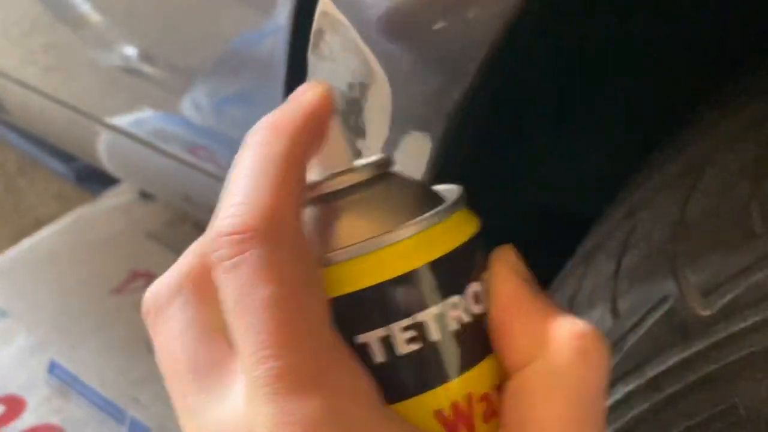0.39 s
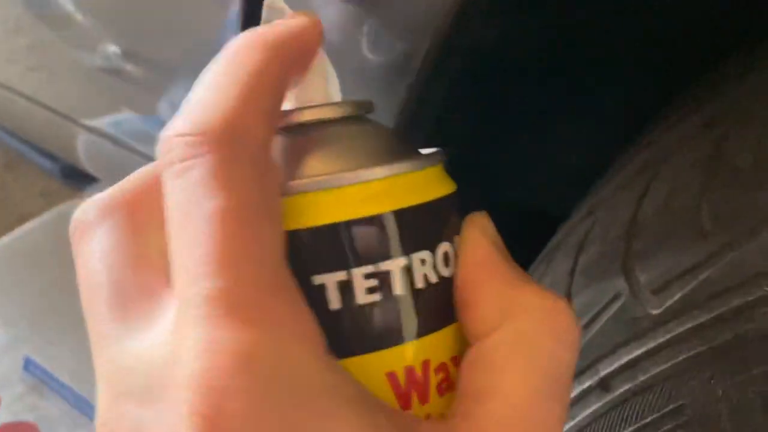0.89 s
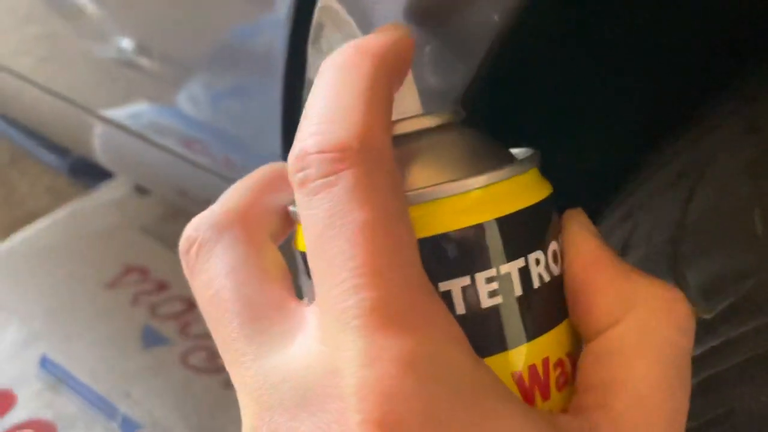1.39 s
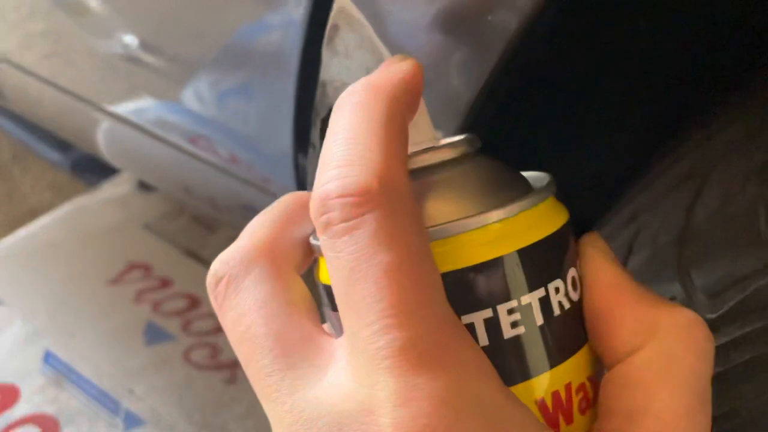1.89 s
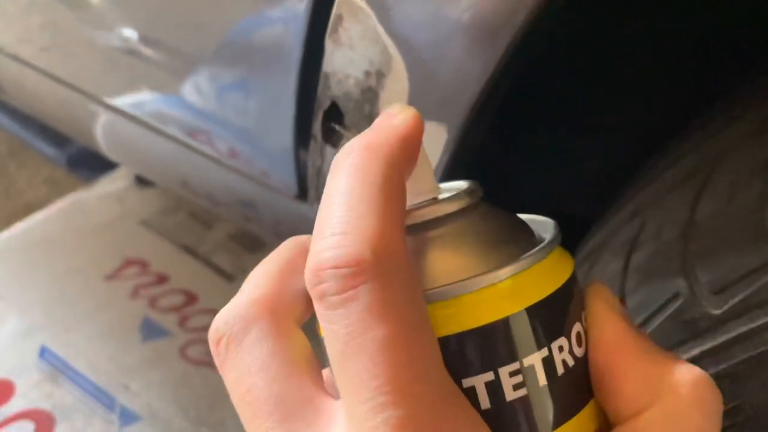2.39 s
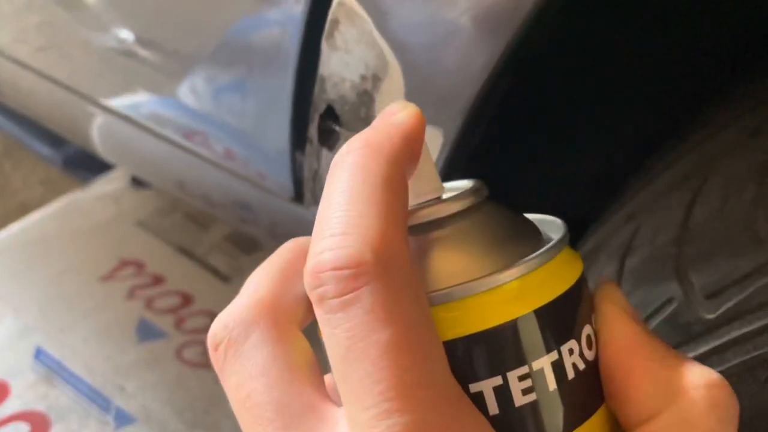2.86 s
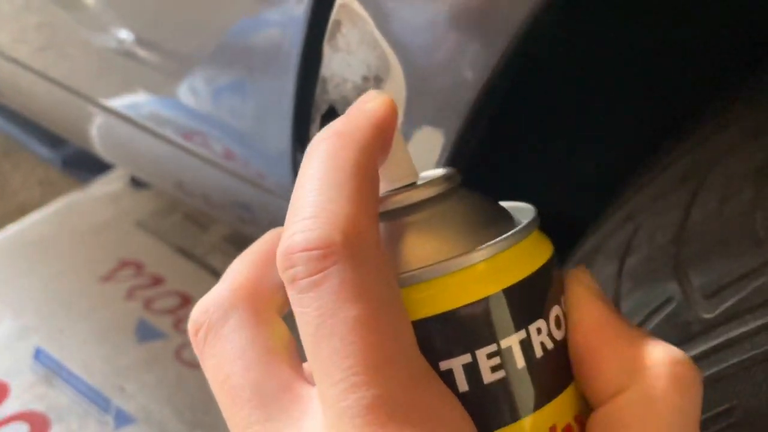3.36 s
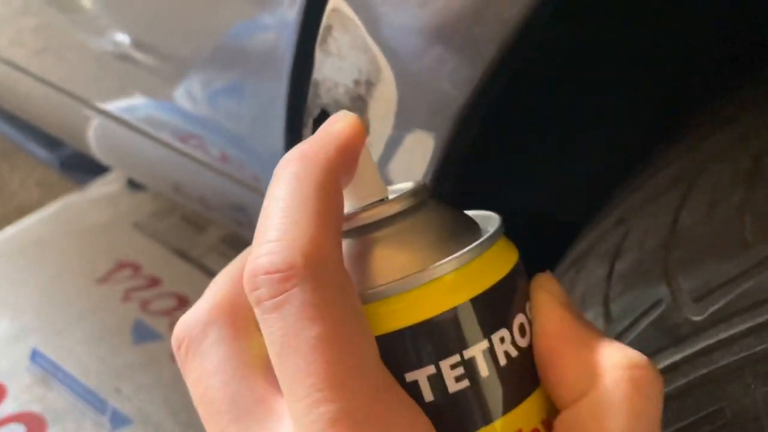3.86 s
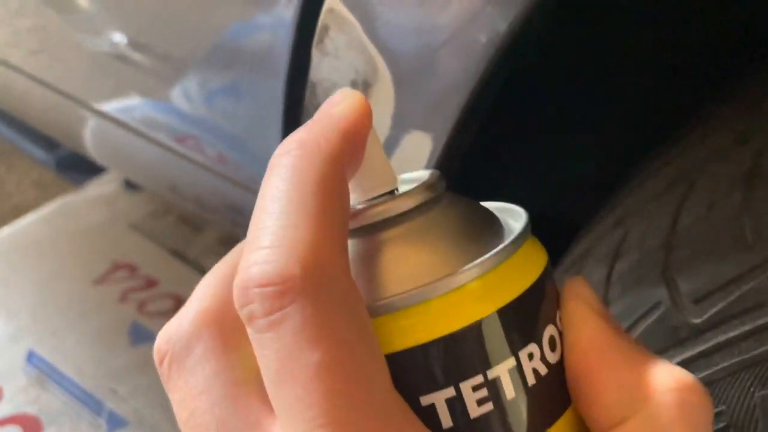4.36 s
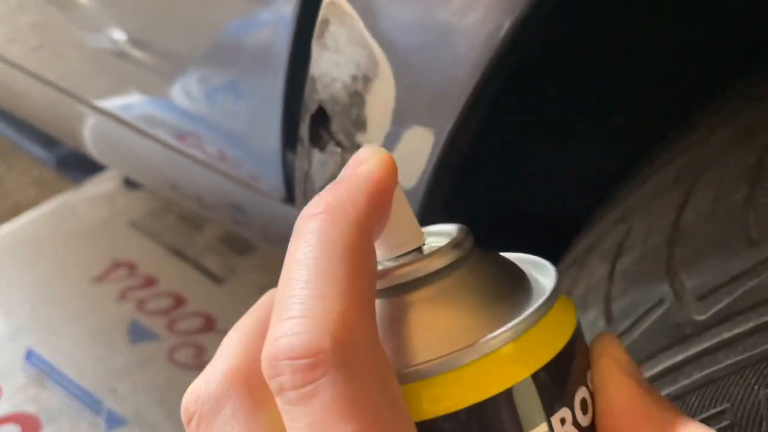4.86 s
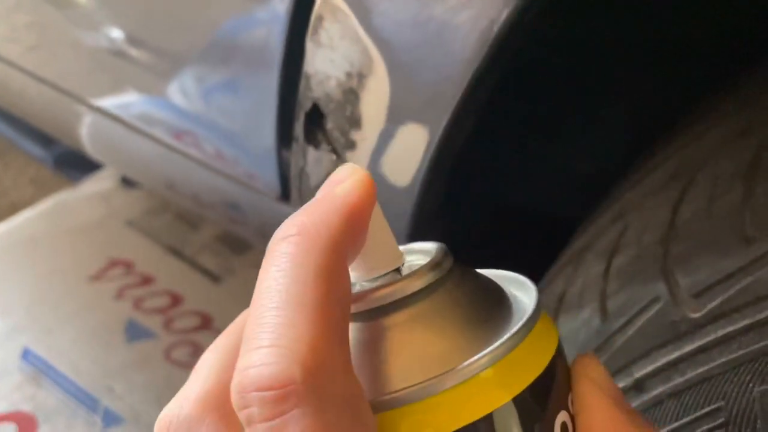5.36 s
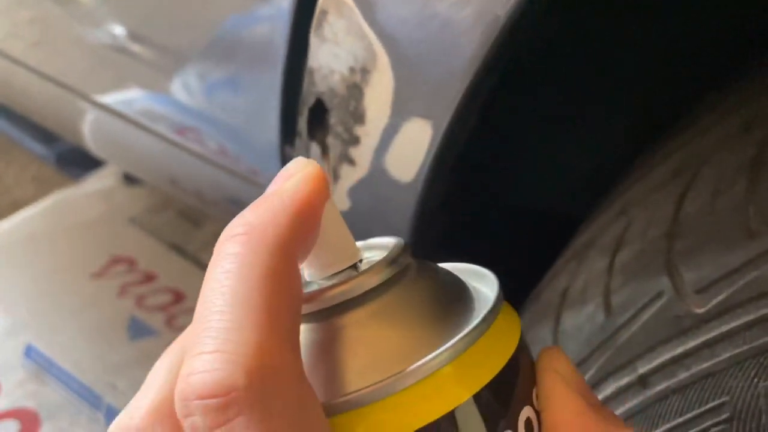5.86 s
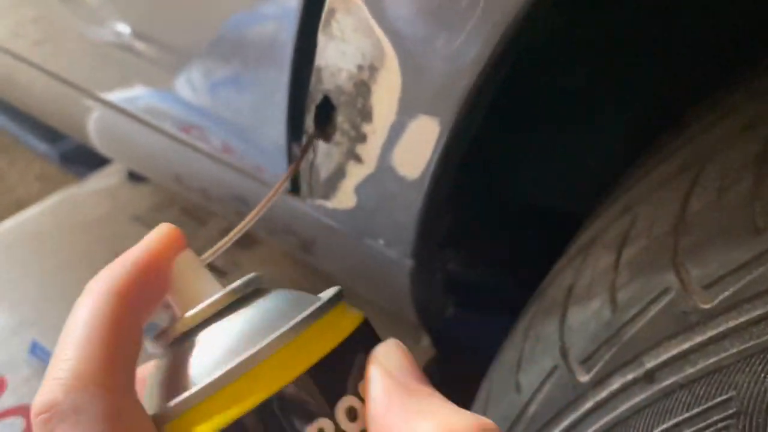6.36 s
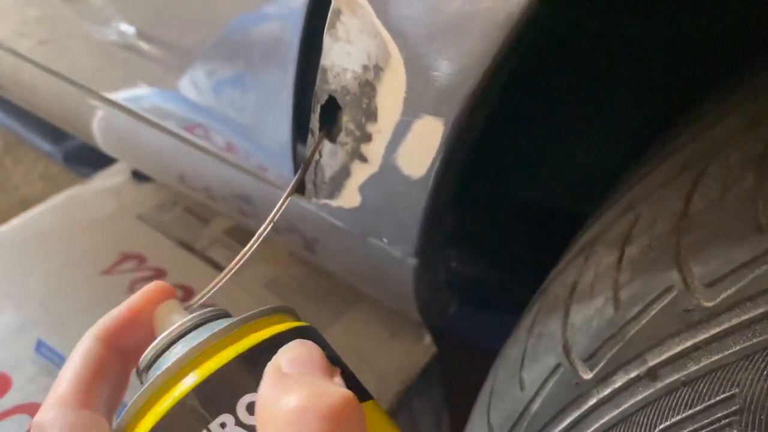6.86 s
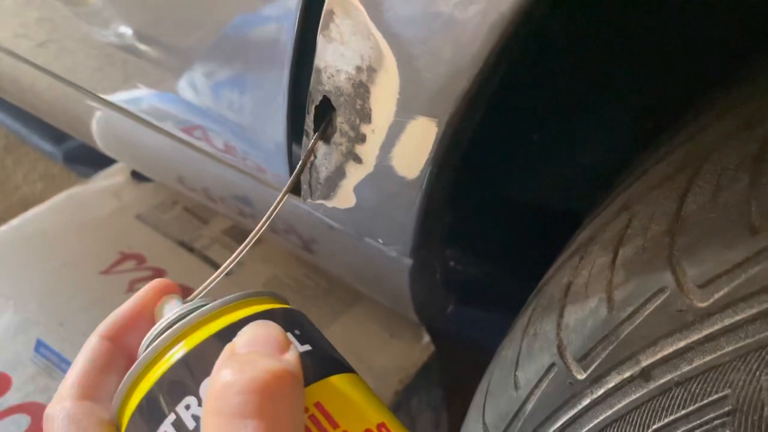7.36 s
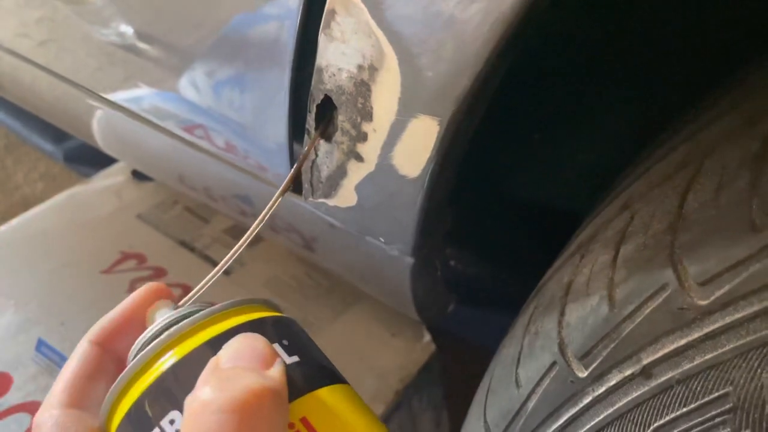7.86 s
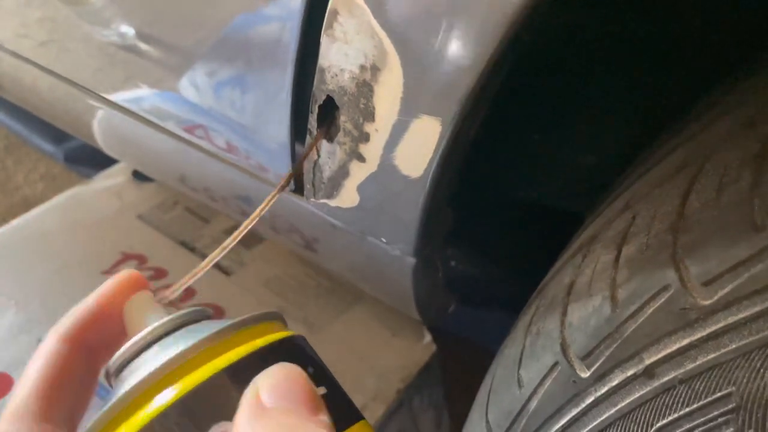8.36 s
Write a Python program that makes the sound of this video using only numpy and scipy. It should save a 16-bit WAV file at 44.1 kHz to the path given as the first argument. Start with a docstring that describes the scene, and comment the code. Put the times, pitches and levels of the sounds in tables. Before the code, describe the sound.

Close aerosol hiss through a thin straw into a hollow steel panel, faint and muffled at first, then bright uneven bursts, with plastic clicks and small knocks.

```python
"""Wax sprayed into a hollow panel

In a workshop, an aerosol can sprays wax through a thin straw into a hollow steel panel, close to a
two-port microphone. A finger opens and shuts the valve: gas hisses at the nozzle, spray rushes in the
straw and booms in the cavity, all as coloured turbulent noise. The plastic button clicks and the straw
knocks the panel, as decaying modes under a short crack; the walls answer and the place rumbles faintly."""
import sys
import numpy as np
from scipy import signal
from scipy.fft import rfft, irfft, next_fast_len
from scipy.io import wavfile
from scipy.ndimage import uniform_filter1d, map_coordinates

SR = 44100
rng = np.random.default_rng(int(sys.argv[2]) if len(sys.argv) > 2 else 0)


def materialize(psi):
    """Save the field psi as 16-bit PCM at rate SR to the path in sys.argv[1].

    A 1-D psi becomes a single channel; in a 2-D psi each row is a channel.
    """
    bounded = np.clip(np.atleast_2d(psi).T, -1, 1)
    quanta = np.round(bounded * 32767).astype(np.int16)
    wavfile.write(sys.argv[1], SR, quanta)


def invert_db(level):
    """Linear amplitude ratio for a level in decibels (20 dB per decade), elementwise."""
    return 10 ** (np.asarray(level, dtype=float) / 20)


N = 385434
T = np.arange(N) / SR  # time of each sample [s]


def unit(x):
    """Scaled to rms 1."""
    return x / np.sqrt(np.mean(x ** 2) + 1e-20)


def along(points, hz):
    """Reads (frequency, value) points at hz, on a log frequency axis."""
    f, v = np.transpose(points)
    return np.interp(np.log(hz + 1), np.log(f + 1), v)


def curves(rows):
    """One value per sample for each column after the time."""
    s, *cols = np.array(sorted(rows)).T
    return [np.interp(T, s, c) for c in cols]


def wobble(rate):
    """A smooth random curve, rate knots a second."""
    knots = rng.standard_normal(int(N * rate / SR) + 4)
    return map_coordinates(knots, [T * rate])


def filtered(x, response):
    """x times a complex response of frequency."""
    m = next_fast_len(N + SR // 2)
    hz = np.fft.rfftfreq(m, 1 / SR)
    return irfft(rfft(x, m) * response(hz), m)[..., :N]


def coloured(x, spectrum, skirt_db):
    """x at rms 1 through a spectrum that falls by skirt_db an octave for four octaves beyond its ends."""
    (lo, lo_db), (hi, hi_db) = spectrum[0], spectrum[-1]
    closed = [(lo / 16, lo_db - 4 * skirt_db), *spectrum, (hi * 16, hi_db - 4 * skirt_db)]
    return unit(filtered(x, lambda hz: invert_db(along(closed, hz))))


def turbulence(patchy_db, spit_db, spit_rate):
    """Two unrelated noises sharing drifting patches and the spit of droplets."""
    z = signal.stft(rng.standard_normal((2, N)), nperseg=512)[2]
    field = rng.standard_normal(z.shape[1:])
    field = uniform_filter1d(field, size=5, axis=0)  # smooth over frequency
    field = uniform_filter1d(field, size=12, axis=1)  # smooth over time
    pair = signal.istft(z * invert_db(patchy_db * unit(field)), nperseg=512)[1][:, :N]
    return pair * invert_db(spit_db * wobble(spit_rate))


def workshop():
    """A low, slightly lumpy rumble with a faint hiss above it."""
    # swell of the background: (time [s], level [dB])
    rumble = [(0, -50), (1, -52), (2.3, -53.5), (3.4, -54), (5.6, -55.5), (6.1, -53.5), (6.7, -54.5),
              (7.6, -52.5), (8.74, -58)]
    # its spectrum: (frequency [Hz], relative level [dB])
    shop = [(25, -14), (45, -5.5), (65, 3), (95, -2), (130, -8), (240, -20), (800, -30.5), (2200, -40),
            (4900, -47), (8000, -52.5), (12000, -43), (14000, -58)]
    lumpy = turbulence(patchy_db=1.2, spit_db=.7, spit_rate=5)
    return invert_db(curves(rumble)[0]) * coloured(lumpy, shop, skirt_db=15)


def echo(x):
    """The walls answer with a diffuse tail, each frequency dying at its own speed."""
    # decay of the room: (frequency [Hz], t60 [s])
    walls = [(200, 0.59), (3000, 0.38), (12000, 0.04)]
    hz, t, z = signal.stft(rng.standard_normal((2, SR // 2)), SR, nperseg=256)
    fading = invert_db(-60 * t / along(walls, hz)[:, None])
    tail = signal.istft(z * fading, SR, nperseg=256)[1]
    return signal.fftconvolve(x, tail / np.linalg.norm(tail[0]), axes=1)[:, :N]


def bounced(x):
    """Near surfaces send weak copies of the direct sound, whose delays drift as the hand moves."""
    # off panel, tyre and floor: (mean delay [s], level [dB])
    bounces = [(.0011, -13), (.0023, -12), (.0047, -12)]
    direct, scattered = x
    late = 0
    for delay, db in bounces:
        drifting = delay * (1 + .09 * wobble(2))
        late = late + invert_db(db) * np.interp(T - drifting, T, direct)
    return np.array([direct + late, scattered])


def struck(events, modes, crack, rise):
    """Each blow rings the modes at new strengths, over a short thin crack; its tilt favours high or low modes."""
    out, t = np.zeros(N + SR), T[:SR // 8]
    for s, db, ring_share, tilt_db in events:
        ring = 0
        for hz, level, t60 in modes:
            tilt = tilt_db * np.log2(hz / modes[1][0])  # pivots on the second mode
            mode_db = level + tilt + rng.normal(0, 1) - 60 * t / t60
            ring = ring + invert_db(mode_db) * np.sin(2 * np.pi * hz * t)
        grit = rng.standard_normal(len(t) + 1)
        thin = grit[1:] - .75 * grit[:-1]
        snap = crack * invert_db(-60 * t / .008) * thin  # t60 8 ms
        onset = 1 - np.exp(-t / rise)
        out[round(s * SR):][:len(t)] += invert_db(db) * (ring_share * ring + snap) * onset
    return out[:N]


def straw_knocks():
    """The straw knocks the panel, whose low steel modes ring briefly after a soft onset."""
    # blows: (time [s], level [dB], tilt [dB an octave])
    knocks = [(0.973, -41, 8.5), (.998, -47, -9), (1.281, -29.5, 2.5), (1.289, -29.5, -9)]
    # modes of the panel: (frequency [Hz], level [dB], t60 [s])
    panel = [(192, -10, 0.046), (324, 1.5, 0.054), (537, -1, 0.026), (776, -1, 0.026), (1330, -23, .03)]
    blows = [(s, db, 1, tilt_db) for s, db, tilt_db in knocks]
    return struck(blows, panel, crack=.01, rise=0.002) * [[1], [.3]]  # direct, scattered


def button_clicks():
    """The plastic button clicks: high, fast-dying modes under a strong crack."""
    # clicks: (time [s], level [dB], strength of the ringing [factor], tilt [dB an octave])
    clicks = [(0.704, -5, 0.65, -3), (1.8597, -40, 0.19, -4), (1.8811, -26, 0.4, -15),
              (2.154, -21.5, 0.4, -18.5), (3.8067, -36, 0.24, 5), (3.941, -34.5, 0.26, 1),
              (4.151, -18, 0.24, -5.5), (8.436, -43.5, 0.18, -1), (8.6727, -28.5, 0.11, -10)]
    # modes of the button: (frequency [Hz], level [dB], t60 [s])
    button = [(1500, -24, .005), (3200, 0, .011), (3530, -12, .02), (4700, -7, .006), (8600, -8, .005),
              (13000, 0, .005)]
    return bounced(struck(clicks, button, crack=0.54, rise=0.00012) * [[1], [.3]])  # direct, scattered


def valve(rise):
    """Pressure builds within rise s of each press, slower through a leak, and dies away after it."""
    # finger on the button: (presses [s], lets go [s], t60 of the pressure dying in the straw [s])
    presses = [(-.1, 1.69, .1), (1.858, 2.515, .04), (2.663, 4.562, .04), (4.629, 5.037, .015),
               (5.166, 8.054, .06), (8.078, 8.336, .065), (8.629, 9, .1)]
    # the valve barely open: (from [s], to [s])
    leaks = [(4.56, 4.63), (5.04, 5.166), (8.585, 8.63)]
    leak_db, leak_t60_s = -19.5, .03
    openings = [(*press, 0) for press in presses] + [(*leak, leak_t60_s, leak_db) for leak in leaks]
    pressure = 0
    for on, off, t60, db in openings:
        build = np.clip((T - on) / (rise / invert_db(db)), 0, 1)
        pressure = pressure + build * invert_db(db - 60 * np.clip(T - off, 0, None) / t60)
    return pressure


def gas_jet(jet_db, sharp):
    """Gas hisses at the nozzle, between a soft and a sharp colour; a weak jet is all soft."""
    # spectra of the two colours: (frequency [Hz], relative level [dB])
    soft_jet = [(5510, -24.5), (6720, -8.5), (7750, -2.5), (9130, 1.5), (9470, 3.5), (10160, 0),
                (10680, -2.5), (12060, -5), (12400, -10.5), (12920, -1), (13780, -10.5), (14300, -20),
                (15680, -34.5)]
    sharp_jet = [(5510, -10), (6030, -14), (6550, -7), (8100, -5.5), (8440, -14.5), (8790, -24),
                 (8960, -21), (9470, 1.5), (9990, -5), (10340, -8), (11370, 3.5), (15680, -5.5)]
    dull_db, dull_span_db = -49, 16  # all soft under dull_db; may sharpen fully this much higher
    gas = turbulence(patchy_db=.9, spit_db=1.7, spit_rate=900)
    sharp = np.clip(sharp, 0, 1) * np.clip((jet_db - dull_db) / dull_span_db, 0, 1)
    jet = sharp * coloured(gas, sharp_jet, skirt_db=27.0)
    jet = jet + (1 - sharp) * coloured(gas, soft_jet, skirt_db=18.5)
    return invert_db(jet_db) * jet


def piped(x):
    """The straw's air column lifts its own notes."""
    # resonances: (frequency [Hz], width [Hz], lift [dB])
    pipe = [(2510, 51, 22.5), (3414, 130, 5), (4130, 150, 4), (5330, 250, 4)]

    def response(f):
        return 1 + sum((invert_db(db) - 1) * 1j * f * w / (c * c - f * f + 1j * f * w) for c, w, db in pipe)
    return filtered(x, response)


def straw_rush(wax_db, straw_db):
    """Wax rushes through the resonant straw and fizzes as droplets leave it."""
    # rush inside the straw: (frequency [Hz], relative level [dB])
    straw = [(2070, -11.5), (2500, -15), (2930, 6.5), (3270, 3.5), (3790, -7)]
    # droplets leaving it: (frequency [Hz], relative level [dB])
    fizz = [(4000, -6), (4480, -7.5), (5000, -1), (5510, -12.5), (6550, -3.5), (7750, -12), (8270, -5),
            (11370, -38.5), (12230, -11.5), (13950, -65)]
    wax = piped(turbulence(patchy_db=1.1, spit_db=1.8, spit_rate=600))
    stream = invert_db(straw_db) * coloured(wax, straw, skirt_db=14.0) + coloured(wax, fizz, skirt_db=33.5)
    return invert_db(wax_db) * stream / np.sqrt(1 + invert_db(straw_db) ** 2)


def hollow_panel(wax_db):
    """Air in the panel sounds its cavity notes and a boom, both lifted by the wax flow, over a low drone."""
    # before the flow lifts it: (time [s], cavity level [dB], boom over the cavity [dB])
    hollow = [(0, -52, 0.5), (.48, -51.5, -9.5), (.54, -54.5, 3), (.65, -56.5, 2), (.7, -49, -0.5),
              (1.1, -52.5, -7), (1.5, -52.5, -0.5), (2, -50, -5.5), (2.45, -50, -5), (2.75, -52.5, -6),
              (3, -48.5, -12.5), (3.6, -50.5, -7), (4.1, -53, -9), (4.45, -52, -14.5), (4.9, -56, -18),
              (5.45, -51, -6.5), (6, -50, -16), (6.35, -53, -7), (6.6, -58, -11), (7, -49, -11),
              (7.6, -51.5, -11), (8.05, -53, -9.5), (8.25, -47.5, -4), (8.74, -54.5, -20)]
    # spectra of the cavity, its boom and its lowest note: (frequency [Hz], relative level [dB])
    cavity_notes = [(480, -9), (730, 0.5), (1080, -4), (1210, 4), (1380, -5), (1460, -1.5), (1640, -7.5),
                    (1810, 2.5), (1940, -8), (2280, -2)]
    boom_note = [(260, -9.5), (300, 3.5), (345, 3), (400, -0.5), (450, -10.5)]
    drone_note = [(155, -3), (177, 3.5), (200, -8)]
    # the lowest note: (time [s], level [dB])
    drone_level = [(0, -63), (1.6, -62), (2.1, -59), (2.6, -61.5), (5.1, -61), (6.4, -58), (7.7, -56.5),
                   (8.74, -62)]
    # lift of the cavity's sound above upper_hz: (time [s], lift [dB])
    upper_lift = [(0, 4.5), (.5, 1), (.6, -1.5), (1.5, 2.5), (3, -4), (4, 0.5), (4.8, 3), (6, 2.5),
                  (6.6, -4.5), (7.4, -3), (8.74, 0.5)]
    upper_hz = 1500
    follows, mean_wax_db = 0.29, -46  # dB of cavity a dB of wax, about this flow
    cavity_db, boom_db = curves(hollow)
    air = turbulence(patchy_db=.8, spit_db=1.2, spit_rate=40)
    cavity = coloured(air, cavity_notes, skirt_db=16)
    upper = filtered(cavity, lambda hz: 1 / (1 + (upper_hz / (hz + 1)) ** 6))
    sound = cavity + (invert_db(curves(upper_lift)[0]) - 1) * upper
    sound = sound + invert_db(boom_db) * coloured(air, boom_note, skirt_db=34)
    sound = invert_db(cavity_db + follows * (wax_db - mean_wax_db)) * sound
    return sound + invert_db(curves(drone_level)[0]) * coloured(air, drone_note, skirt_db=31.5)


def spray():
    """Jet and straw follow the valve at once and flutter a little; the cavity fills more slowly."""
    # flow while the valve is open: (time [s], gas jet at the nozzle [dB], wax leaving the straw [dB])
    flow = [(0, -52, -48.5), (.4, -59, -49), (.49, -65, -51.5), (.51, -44.5, -50.5), (.66, -58, -46),
            (.69, -48, -55), (.76, -54, -51.5), (1.1, -63.5, -54), (1.2, -65, -53.5), (1.5, -83, -47),
            (1.7, -64, -49), (1.86, -53, -52), (1.89, -60, -44.5), (2.2, -61.5, -49.5), (2.3, -42, -51),
            (2.44, -36.5, -46.5), (2.52, -41.5, -52.5), (2.67, -41, -49), (2.72, -34.5, -45.5),
            (2.85, -37.5, -41), (3.02, -32.5, -38.5), (3.06, -41, -42.5), (3.17, -32.5, -41.5),
            (3.34, -41.5, -44), (3.37, -59, -57.5), (3.65, -58.5, -51), (3.94, -71, -54),
            (3.965, -38.5, -41.5), (4.135, -47.5, -45), (4.152, -30.5, -43), (4.22, -31.5, -38.5),
            (4.37, -38, -43.5), (4.49, -37.5, -37.5), (4.56, -48.5, -49), (4.633, -50, -42),
            (4.655, -47, -48), (4.7, -41, -41.5), (4.9, -40.5, -40.5), (5.03, -41.5, -48),
            (5.17, -39.5, -43.5), (5.57, -31, -39), (5.61, -31, -35), (5.73, -30, -41.5),
            (5.8, -32.5, -39.5), (6.05, -30, -36), (6.2, -33, -44), (6.34, -26, -36.5), (6.52, -31, -46.5),
            (6.6, -40.5, -44), (6.81, -36.5, -44.5), (6.95, -29, -47), (7.2, -29.5, -48.5),
            (7.32, -28, -48.5), (7.5, -42.5, -51), (7.6, -33.5, -53), (7.92, -27, -43.5),
            (8.05, -29.5, -45.5), (8.09, -36, -44), (8.14, -27, -42.5), (8.3, -27.5, -40.5),
            (8.36, -34.5, -49), (8.635, -38.5, -46.5), (8.69, -36.5, -45), (8.74, -33.5, -36.5)]
    # colour as the can is tilted: (time [s], straw rush over the fizz [dB], most sharp jet [share 0-1])
    colour = [(0, 9, .6), (.45, 7, .6), (.58, -7, .4), (.72, 1.5, 0.9), (1.6, 9, 0.5), (1.95, 13, .6),
              (2.25, 3.5, 0.5), (2.45, 1, .2), (2.75, -6.5, 0.1), (3.2, 2, .4), (3.6, 4.5, 0.3),
              (4.15, -1.5, 0.5), (4.5, 0, 0.2), (4.75, -2.5, .4), (5.25, -5, 1), (5.65, -8.5, .9),
              (5.95, 3.5, 0.5), (6.15, 1, 0.7), (6.5, 0, .2), (6.85, 3, 0.9), (7.2, 2, 0.7),
              (7.6, 5.5, 0.3), (8.1, -7.5, .8), (8.6, -4, 0.2), (8.74, -1, .5)]
    jet_db, wax_db = curves(flow)
    straw_db, sharp = curves(colour)
    hiss = gas_jet(jet_db, sharp) + straw_rush(wax_db, straw_db)
    flutter = invert_db(.7 * wobble(14))
    return flutter * valve(rise=.004) * bounced(hiss) + valve(rise=.03) * hollow_panel(wax_db)


def scene():
    """Spray and blows close by, their echo off the walls and the workshop behind."""
    near = spray() + button_clicks() + straw_knocks()
    return near + invert_db(-20) * echo(near) + workshop()


def ports(pair):
    """Direct and scattered sound fill two channels whose likeness, phase and balance vary with frequency."""
    # phase between the channels as heard: (frequency [Hz], right minus left [radians])
    phase = [(100, 0), (700, -.7), (1300, -1), (2000, -1.4), (2700, -2.9), (3100, -4.1), (3500, -5.6),
             (3900, -6.25), (5200, -6.35), (5700, -5.7), (6700, -5.2), (7900, -3.2), (9400, -3.1),
             (10000, -2.3), (11500, -1.3), (12900, 0)]
    # likeness of the channels: (frequency [Hz], correlation [0-1])
    alike = [(60, .93), (400, .9), (900, .82), (1600, .65), (2300, .55), (2900, .85), (3500, .75),
             (4100, .98), (5100, .96), (5900, .55), (7000, .7), (8000, .99), (9400, .99), (11000, .78),
             (12900, .99)]
    # balance: (frequency [Hz], left minus right [dB])
    balance = [(60, 2.5), (110, -1), (200, 1.5), (380, 3.0), (700, 7.5), (1290, 2.5), (2380, 5),
               (4400, 3.5), (7500, 2.5), (8200, 3.5), (9500, 1.5), (15000, -2.5)]

    def response(hz):
        turn = np.arccos(np.clip(along(alike, hz), 0, 1)) / 2
        left = invert_db(along(balance, hz) / 2)
        right = np.exp(1j * along(phase, hz)) / left
        return np.array([[np.cos(turn) * left, np.sin(turn) * left],
                         [np.cos(turn) * right, -np.sin(turn) * right]])
    return filtered(pair[None], response).sum(axis=1)


def low_pass(x):
    """Removes everything above the highest recorded frequency."""
    return signal.sosfilt(signal.butter(12, 17000, fs=SR, output="sos"), x)


def record(dry):
    """Two microphone ports pick up the scene, with nothing from 15.9 kHz up."""
    mix = filtered(ports(dry), lambda hz: hz < 15900)
    return low_pass(mix)


dry = scene()
out = record(dry)
materialize(out)
```